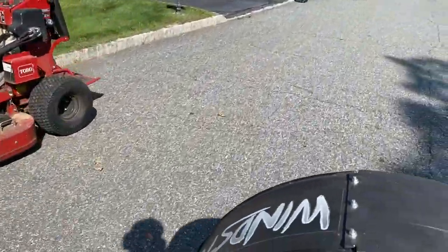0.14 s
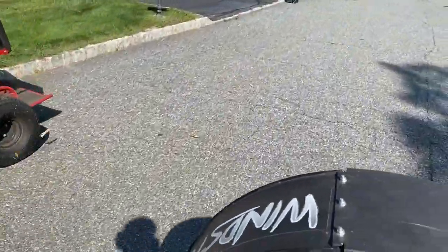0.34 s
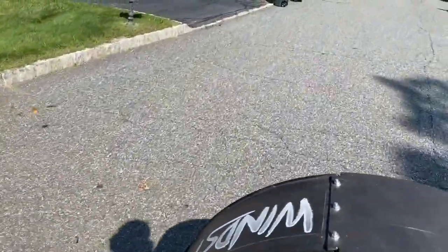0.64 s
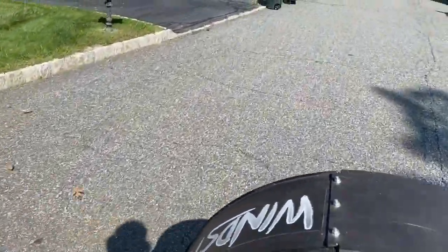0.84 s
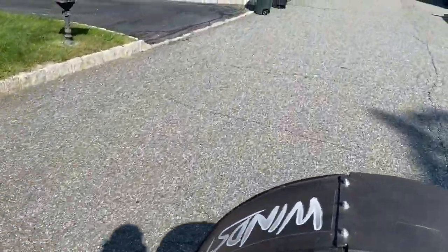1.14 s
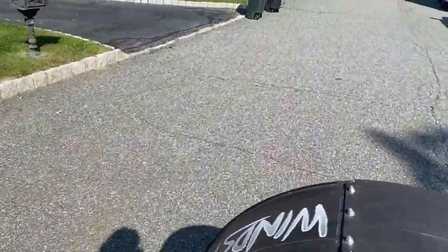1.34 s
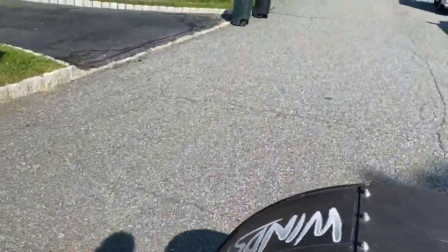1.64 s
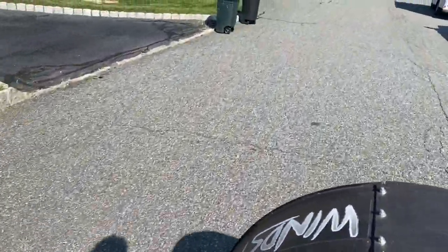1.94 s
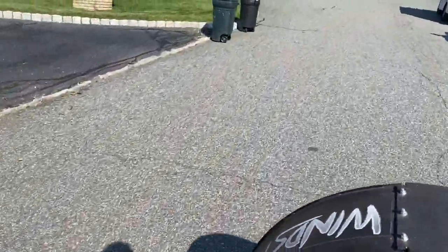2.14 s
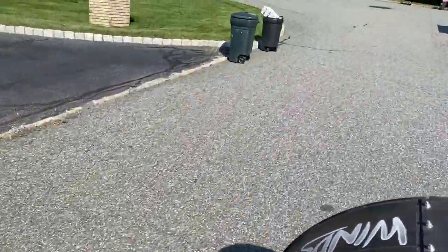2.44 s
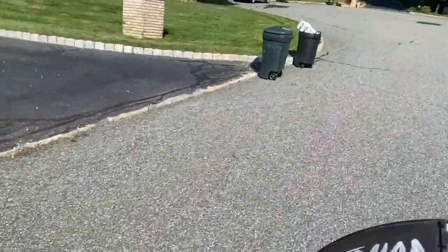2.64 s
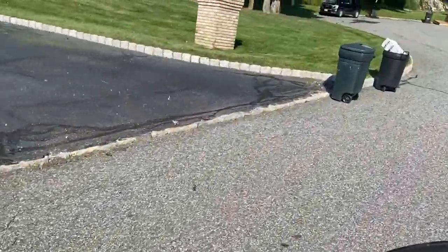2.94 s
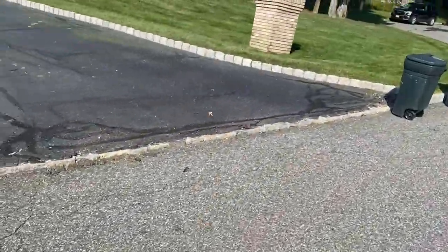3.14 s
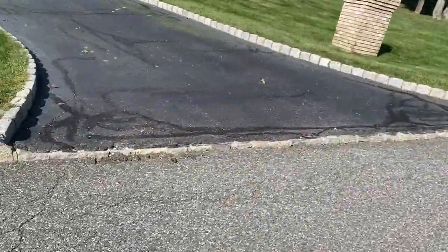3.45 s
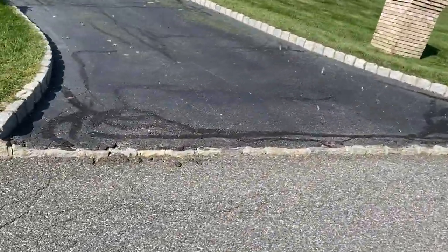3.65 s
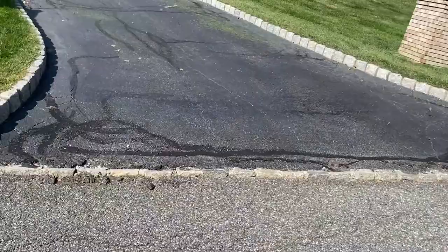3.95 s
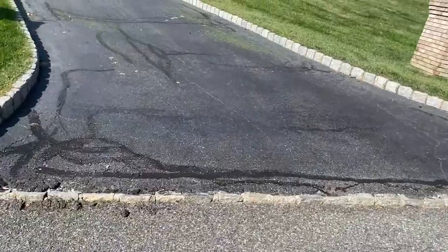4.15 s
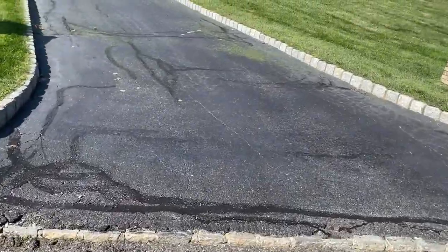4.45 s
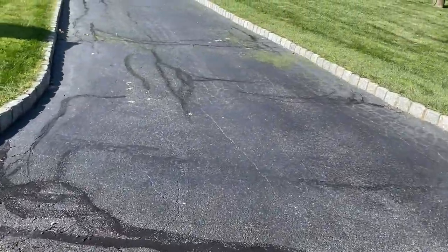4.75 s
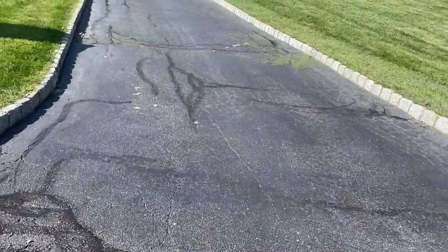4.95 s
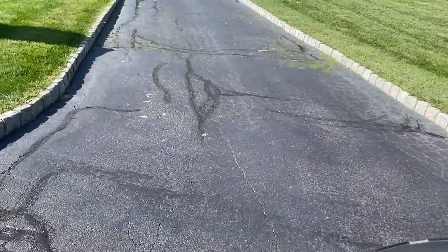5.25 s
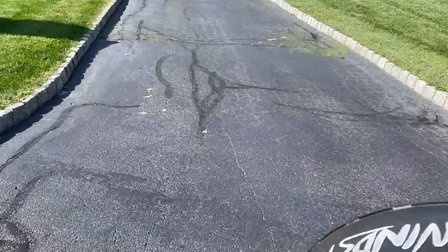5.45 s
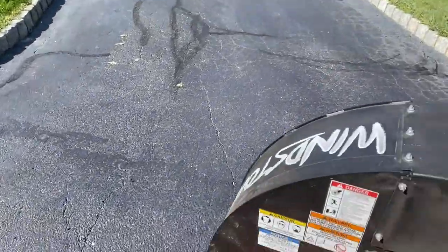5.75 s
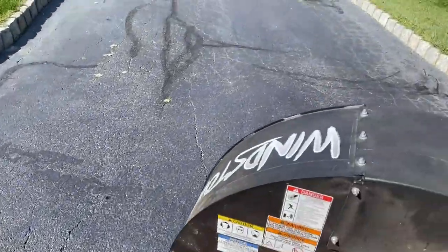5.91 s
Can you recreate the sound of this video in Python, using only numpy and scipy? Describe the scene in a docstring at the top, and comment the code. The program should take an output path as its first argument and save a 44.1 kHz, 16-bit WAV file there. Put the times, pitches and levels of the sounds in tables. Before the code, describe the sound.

A stand-on petrol blower heard from the driver's place at full speed on an open paved street. Dense rushing air and a strong singing fan tone ride over a fast, uneven two-cylinder throb with hiss and clatter. Around the middle the pitch rises very slightly and the fan tone weakens as the machine turns into a driveway; near the end low wind buffets the microphone.

```python
"""A roar of air with a singing blade tone over a throbbing engine: a stand-on leaf blower at full throttle,
heard from the driver's place as it turns from a street into a driveway. The belt-driven fan is a set of
fluttering tones over shaped noise. The V-twin engine is thumps, hiss, clatter and whines locked to its crank.
The governor lets the speed step up slightly; overtones shift in the turn, and late on, thrown-back air buffets."""
import sys
import numpy as np
from scipy import signal
from scipy.fft import rfft, irfft, next_fast_len
from scipy.io import wavfile

SR = 44100
rng = np.random.default_rng(int(sys.argv[2]) if len(sys.argv) > 2 else 0)


def generate_wav(signal):
    """Clip the signal to [-1, 1] and save it as 16-bit WAV at the path in sys.argv[1]."""
    frames = np.transpose(np.atleast_2d(signal))
    scaled = np.clip(frames, -1, 1) * 32767
    pcm = np.round(scaled).astype(np.int16)
    wavfile.write(sys.argv[1], SR, pcm)


N = 268128
TIME = np.arange(N) / SR  # seconds
HZ = np.fft.rfftfreq(N, 1 / SR)

# The two cylinders fire 270 and 450 degrees apart. Each row: place in the cycle (0-1),
# relative strength on the street in dB, the same in the driveway in dB, decay in cycles.
FIRING_TABLE = [(0.28, 0.5, 1.2, 0.4), (0.665, 1.2, 1.5, 0.58)]
# Colour of the firing hiss, also lent to the clatter. Each row: frequency in Hz, level in dB per Hz.
HISS_COLOUR = [(20, -64), (1300, -80.5), (2300, -64), (3000, -79), (3350, -73.5), (3800, -79),
               (5000, -72.5), (6000, -76.5), (6700, -74.5), (7800, -79), (9400, -79.5), (11200, -80),
               (15500, -89.5)]
# The chute comes round and throws air back.
BACKWASH_AT, BACKWASH_S = 5.55, .028  # seconds


def amp(db):
    """Turn decibels into a gain."""
    return 10 ** (np.asarray(db) / 20)


def unit(x):
    """Scale a signal to an rms (average strength) of 1."""
    return x / np.sqrt(np.mean(x ** 2) + 1e-20)


def spectrum(points):
    """Read a table between its points, on a logarithmic frequency axis."""
    hz, value = np.transpose(points)
    return np.interp(np.log(HZ + 1), np.log(hz + 1), value)


def drift(rate_hz):
    """Smooth random wandering of rms 1, up to about the given rate."""
    # Made with few points, then stretched to full length.
    count = next_fast_len(int(16 * rate_hz * N / SR))
    hz = np.arange(count // 2 + 1) * SR / N
    slow = irfft(rfft(rng.standard_normal(count)) / (1 + (hz / rate_hz) ** 4), count)
    return unit(np.interp(np.arange(N) * count / N, np.arange(count), slow))


def change(at, seconds):
    """A smooth step from 0 to 1."""
    return .5 + .5 * np.tanh((TIME - at) / seconds)


def bump(at, length):
    """A smooth hump that reaches 1 at the given time."""
    return np.exp(-((TIME - at) / length) ** 2)


def turn(street, driveway):
    """A value that passes from its street state to its driveway state as the machine turns."""
    turn_at, turn_s = 2.97, .71
    return street + (driveway - street) * change(turn_at, turn_s)


def noise(points, envelope):
    """Turbulence: random noise under an envelope, coloured by a table, partly alike at both ports."""
    # Each row: frequency in Hz, likeness of the two ports (0-1).
    port_likeness = [(150, 1), (350, .995), (1000, .88), (2000, .9), (3000, .8), (6300, .86), (7300, .97),
                     (8500, .88), (15000, .84)]
    common, apart = rfft(rng.standard_normal((2, N)) * envelope)
    like = np.clip(spectrum(port_likeness), 0, 1)
    mid = common * np.sqrt((1 + like) / 2)
    side = apart * np.sqrt((1 - like) / 2)
    ports = np.array([mid + side, mid - side])
    return irfft(ports * amp(spectrum(points)), N) * np.sqrt(SR / 2)  # sqrt makes it dB per Hz


def tone(turns, flutter):
    """A line of rms 1; changing ground echoes stray its phase slowly, turbulence shakes it quickly."""
    stray_turns, stray_hz = .07, .7
    turns = turns + stray_turns * drift(stray_hz)
    slower_shake = drift(21) + 1j * drift(20)
    faster_shake = drift(70) + 1j * drift(59)
    shake = .7 * slower_shake + .7 * faster_shake
    return unit(((1 + flutter * shake) * np.exp(2j * np.pi * turns)).real)


def shade(hz):
    """The chute swings across the front and hides the whistles above about 1.5 kHz."""
    swing_at, swing_s, shade_db = 5.72, .068, -6
    return amp(shade_db * change(swing_at, swing_s) / (1 + (1500 / hz) ** 6))


def flare_db(flares, multiple):
    """How far a line rises while a lobe of its beam points at the microphone, or sinks in a gap."""
    return sum(db * bump(at, length) for k, at, length, db in flares if round(k) == round(multiple))


def band(x, hz, octaves):
    """A bell-shaped slice of the spectrum."""
    return irfft(rfft(x) * np.exp(-(np.log2((HZ + 1) / hz) / octaves) ** 2), N)


def rpm():
    """Crank speed: as the load eases, the governor lets it step up, overshoot and hunt back to rest."""
    street_rpm, step_rpm, overshoot_rpm = 3301.17, 16.6, 14.93
    ease_at, ease_s = 2.351, .126
    overshoot_at, hunt_period_s, hunt_decay_s = 2.793, 2.444, 1.362
    since = TIME - overshoot_at
    swing = np.cos(2 * np.pi * since / hunt_period_s)
    hunting = np.exp(-np.maximum(since, 0) / hunt_decay_s) * swing
    return street_rpm + change(ease_at, ease_s) * (step_rpm + overshoot_rpm * hunting)


def crank():
    """Count four-stroke cycles of two turns each; the governor lets the crank run a little ahead or behind."""
    start_cycles, wander_cycles, wander_hz = -.064, .0045, 1.8
    steady = np.cumsum(rpm()) / (2 * 60 * SR)
    return start_cycles + steady + wander_cycles * drift(wander_hz)


def bursts(cycles):
    """Each firing lets out a burst that rises fast and then decays: an envelope of rms 1."""
    rise_cycles, uneven_db = .04, 1.46
    power = np.zeros(N)
    for place, street_db, drive_db, decay in FIRING_TABLE:
        since = (cycles - place) % 1
        strength = amp(turn(street_db, drive_db) + uneven_db * drift(22))
        shape = (1 - np.exp(-since / rise_cycles)) * np.exp(-since / decay)
        power += (strength * shape) ** 2
    return unit(np.sqrt(power))


def roar_db():
    """The roar sinks in the turn, passes through a lull near the kerb and returns with the backwash."""
    street_db, driveway_db, backwash_db = 2, -.5, 2.5
    lull = -.5 * bump(3.7, .29)
    return turn(street_db, driveway_db) + lull + backwash_db * change(BACKWASH_AT, BACKWASH_S)


def air(burst):
    """The air jet flutters with the firings; its low roar swells and sinks while its top stays even."""
    # Rush of air through the fan. Each row: frequency in Hz, level in dB per Hz before the roar's changes.
    air_colour = [(20, -91), (44, -81), (75, -53.5), (98, -62.5), (125, -58.2), (205, -56.5), (280, -59.5),
                  (400, -64), (540, -62), (770, -59), (830, -62), (1100, -63.5), (1700, -66.5), (2000, -64),
                  (2400, -65.5), (3800, -72.5), (5500, -78.5), (9000, -102.5), (15500, -80)]
    gust_db, rough_db, pulse, split_hz = .5, .73, .14, 1900
    gusts = amp(gust_db * drift(13) + rough_db * drift(190))
    rush = noise(air_colour, gusts * unit(1 + pulse * burst))
    roar = irfft(rfft(rush) / (1 + (HZ / split_hz) ** 6), N)
    top = rush - roar
    return roar * amp(roar_db()) + top


def blade_strength():
    """The blade tone fades as the fan turns away; a waver of constant size shows more once it is weak."""
    street_db, driveway_db, waver_db, waver_hz = -17.5, -25.5, -51, 4.5
    return turn(amp(street_db), amp(driveway_db)) + amp(waver_db) * drift(waver_hz)


def fan(cycles):
    """Blades pass the lip of the housing; uneven inflow shakes the higher overtones most."""
    # Overtones of the blade tone. Each row: multiple of the blade tone, level on the street in dB,
    # level in the driveway in dB, time of the change in seconds.
    overtone_table = [(2, -28, -27.5, 2.3), (3, -37.5, -45, 3.2), (4, -37, -47.5, 2.1),
                      (5, -32.5, -49, 2.41), (6, -38.5, -35, 3.2), (7, -36.5, -40, 4), (8, -51, -47, 2.9),
                      (9, -71, -48, 2), (10, -49, -57, 2.4), (12, -67, -51, 2.8), (13, -54, -55, 2.8),
                      (14, -48.5, -59, 2.5)]
    # Flares and dropouts as lobes of the fan's beam sweep past. Each row: multiple of the blade tone,
    # time in seconds, half-length in seconds, rise or fall in dB.
    overtone_flares = [(3, 1.2, .13, -11), (3, .55, .1, -3), (3, 1.85, .15, -3), (3, 2.5, 0.3, 2.5),
                       (3, 3.9, .24, -14), (3, 4.85, .4, 3), (3, 5.6, .12, -9), (3, 5.95, .15, 4),
                       (4, 3.95, .3, -9), (4, 5.4, .3, 7), (5, 3.45, .22, 7.5), (5, 4.7, .3, -5),
                       (6, 1.1, .2, -3), (7, 5.6, .5, -4), (8, 3.45, .35, 7.5), (9, 2.9, .5, 5.5),
                       (9, 3.65, .25, -8), (10, 2.9, .4, 2)]
    blades_per_crank_turn = 5.7203  # the belt drive makes this uneven
    jerk_passes, blade_flutter = .002, .058
    overtone_flutter, waver_db = .012, .09  # both grow with the multiple
    jerk = jerk_passes * np.sin(2 * np.pi * cycles)  # the belt jerks once a cycle
    passes = 2 * blades_per_crank_turn * cycles + jerk
    pass_hz = passes[-1] / TIME[-1]
    out = blade_strength() * tone(passes + rng.random(), blade_flutter)
    for k, street_db, drive_db, at in overtone_table:
        level_db = street_db + (drive_db - street_db) * change(at, .29)
        level_db = level_db + flare_db(overtone_flares, k) + waver_db * k * drift(4.8)
        line = tone(round(k) * passes + rng.random(), overtone_flutter * k)
        out += amp(level_db) * shade(k * pass_hz) * line
    return out


def exhaust(cycles):
    """The muffler smears each pressure wave, delaying its lower orders; a puff follows each firing."""
    # Exhaust note: level in dB of the 1st, 2nd, 3rd .. multiple of the four-stroke cycle rate.
    order_levels = [-50, -30.7, -39.8, -42, -37.8, -35.3, -46, -40.3, -46, -44.5, -41.5, -45, -60, -51]
    # Uneven thump. Each row: frequency in Hz, level in dB per Hz before the thump level below.
    thump_colour = [(20, -108), (38, -97), (56, -73), (110, -74), (200, -61.5), (300, -60), (450, -68.5),
                    (2000, -100)]
    delay, smear, jitter = .04, .05, .005  # cycles; each charge burns a little early or late
    puff_lag, puff_width = .22, .16  # cycles
    uneven, thump_db = .065, -4
    wave = cycles - delay + jitter * drift(14)
    note = np.zeros(N)
    for k, db in enumerate(order_levels, 1):
        order = np.cos(2 * np.pi * k * (wave + smear * k))  # higher orders come earlier
        note += amp(db) * np.sqrt(2) * order * (1 + uneven * drift(6.8))
    puff = np.zeros(N)
    for place, *_ in FIRING_TABLE:
        from_peak = (cycles - place - puff_lag + .5) % 1 - .5
        puff += np.exp(-.5 * (from_peak / puff_width) ** 2)
    thump = noise(thump_colour, unit(puff))
    return note + amp(thump_db + .5 * roar_db()) * thump  # the thump follows half the roar's changes


def firing_hiss(burst):
    """Turbulent hiss let out with each firing."""
    return noise(HISS_COLOUR, burst)


def sizzle(burst):
    """A fluttering, ringing rasp near 5 kHz that flares with each firing."""
    center_hz, half_width_octaves = 4990, .064
    level_db, street_db, flutter_db = -50, -3, 4
    ringing = band(rng.standard_normal(N), center_hz, half_width_octaves)
    rasp = unit(ringing * burst * amp(flutter_db * drift(60)))
    return amp(level_db + turn(street_db, 0)) * rasp


def clatter(cycles):
    """Valves and pistons knock at the same crank angles every cycle: a fine comb of lines."""
    level_db, knock_count, ring_s = -6, 14, .0048
    knocks = np.zeros(N)
    for place, size in zip(rng.random(knock_count), rng.standard_normal(knock_count)):
        knocks[1:] += size * np.diff(np.floor(cycles - place))  # one click each cycle
    ring = rng.standard_normal(N) * np.exp(-TIME / ring_s)
    colour = amp(spectrum(HISS_COLOUR) + level_db) / (1 + (HZ / 5000) ** 4)
    body = rfft(ring / np.linalg.norm(ring)) * colour
    return irfft(rfft(unit(knocks)) * body, N) * np.sqrt(SR / 2)


def whine(cycles):
    """Gears, belt and flywheel fins give thin lines; neighbours beat loosely and all throb a little."""
    # Each row: multiple of the cycle rate, level on the street in dB, level in the driveway in dB,
    # roughness (0 is a steady line), time of the change in seconds.
    whine_table = [(28.65, -57, -50, .15, 2), (38, -52.5, -51, .15, 2), (40.3, -58, -53, .1, 2.1),
                   (42, -55, -51, .4, 2.6), (70, -42.7, -50, .05, 2.3), (80.5, -53, -39.5, .03, 2.3),
                   (94, -62, -58, .3, 2), (118.4, -55, -57, .4, 2.3), (119.8, -54, -60, .15, 1.8),
                   (120.8, -48.5, -42.8, .14, 2), (121.8, -59, -55.5, .3, 2.2),
                   (122.8, -55, -44.8, .3, 2.9), (125.8, -54, -55, .2, 2), (145, -64, -57, .8, 2.6),
                   (161, -58, -61, 3, 2.5), (177.5, -55, -58, 1, 2.8), (181.1, -62, -52.5, .6, 3.1),
                   (203, -58, -68, 1.1, 3), (232, -65, -58, 1, 3), (243, -61, -59, 1, 2)]
    # Lines that flare or drop out as lobes of their beams sweep past. Each row: multiple of the cycle rate,
    # time in seconds, half-length in seconds, rise or fall in dB.
    whine_flares = [(40.3, 2.7, .45, 11), (40.3, 3.75, .3, -6), (80.5, 3.1, .3, 4), (120.8, 3.5, .2, -7),
                    (121.8, 2.9, .55, 9), (161, 5.85, .35, 11.5), (203, 2.65, .35, 5)]
    waver_db, shaded_share = .9, .8
    throb_db, throb_place = .8, .9  # strongest at this place in the cycle (0-1)
    cycle_hz = cycles[-1] / TIME[-1]
    out = np.zeros(N)
    for k, street_db, drive_db, rough, at in whine_table:
        level_db = street_db + (drive_db - street_db) * change(at, .3)
        level_db = level_db + flare_db(whine_flares, k) + waver_db * drift(3.2)
        line = tone(k * cycles + rng.random(), rough)
        out += amp(level_db) * shade(k * cycle_hz) ** shaded_share * line
    return out * amp(throb_db * np.cos(2 * np.pi * (cycles - throb_place)))


def swell_bands(x):
    """Single bands of the whole sound, among them a whistle near 5.6 kHz, swell or sink for a moment."""
    # Each row: time in seconds, half-length in seconds, frequency in Hz, half-width in octaves,
    # gain change in dB.
    swell_table = [(3.0, 0.59, 3100, .14, 1), (3.4, 0.28, 3500, 0.37, 2), (4, 1.0, 11400, 0.1, 4),
                   (5.7, 1, 850, 0.79, 1), (3.4, 0.46, 760, 0.15, 3), (3.2, .9, 1450, .1, -1.5),
                   (3.5, .9, 5150, .1, -1), (0.39, 0.64, 5660, 0.044, 5.5), (1.8, .7, 5700, .07, 3.5),
                   (3.5, 1, 6100, 0.045, 2), (5.85, 0.3, 5800, .04, 4), (5.8, .6, 5500, .03, 5),
                   (5.95, .3, 3760, .08, -4)]
    out = x.copy()
    for at, length, hz, octaves, db in swell_table:
        extra_gain = amp(db * bump(at, length)) - 1
        out += extra_gain * band(x, hz, octaves)
    return out


def buffet():
    """Low gusts shake the microphone from the moment the backwash arrives."""
    # Each row: frequency in Hz, level in dB per Hz before the buffet level below.
    buffet_colour = [(20, -90), (42, -70), (62, -55), (82, -42), (110, -62), (200, -62), (500, -91),
                     (2000, -110)]
    buffet_db = -2.5
    return noise(buffet_colour, amp(buffet_db) * change(BACKWASH_AT, BACKWASH_S))


def scene():
    """The crank drives the engine and fan; the backwash gusts are added on top."""
    cycles = crank()
    burst = bursts(cycles)
    engine = exhaust(cycles) + firing_hiss(burst) + sizzle(burst) + clatter(cycles) + whine(cycles)
    machine = engine + fan(cycles) + air(burst)
    return swell_bands(machine) + buffet()


def record(dry):
    """Two microphone ports hear with different phase and level; then a low cut and a treble limit."""
    # Each row: frequency in Hz, left level over right in dB.
    port_balance = [(200, 0), (320, .9), (640, 1.5), (900, .3), (2400, 0)]
    # Each row: frequency in Hz, phase by which the left leads in radians.
    port_phase = [(20, 0), (200, 0.02), (320, 0.14), (640, 0.46), (950, 0.96), (1150, 0.64), (1900, 0),
                  (2500, 0.67), (3500, 0.6), (4400, 0.86), (5100, 0.53), (6100, 1.5), (7300, np.pi),
                  (8500, 4.08), (10300, 2 * np.pi), (12000, 7.66), (13600, 3 * np.pi), (15800, 10.6)]
    low_cut_hz, treble_limit_hz = 39, 15900
    halves = np.array([[.5], [-.5]])  # half of each difference goes to each port
    ports = amp(spectrum(port_balance) * halves) * np.exp(1j * spectrum(port_phase) * halves)
    low_cut = 1 - 1 / (1 + (HZ / low_cut_hz) ** 4)
    heard = irfft(rfft(dry) * ports * low_cut, N)
    treble_limit = signal.firwin(511, treble_limit_hz, window=("kaiser", 9), fs=SR)
    return signal.oaconvolve(heard, treble_limit[None], "same")


dry = scene()
out = record(dry)
generate_wav(out)
```